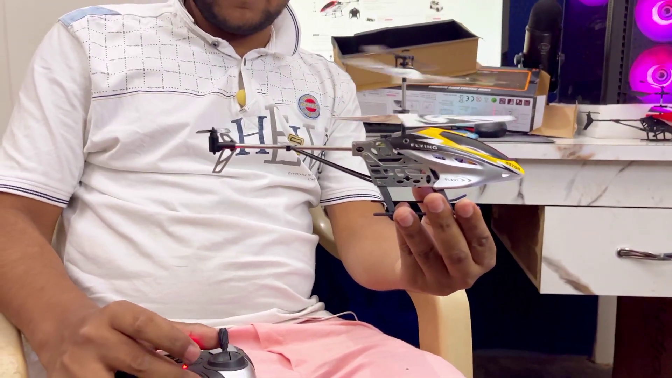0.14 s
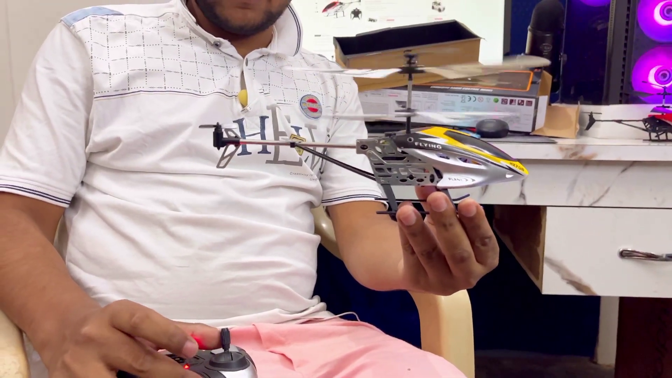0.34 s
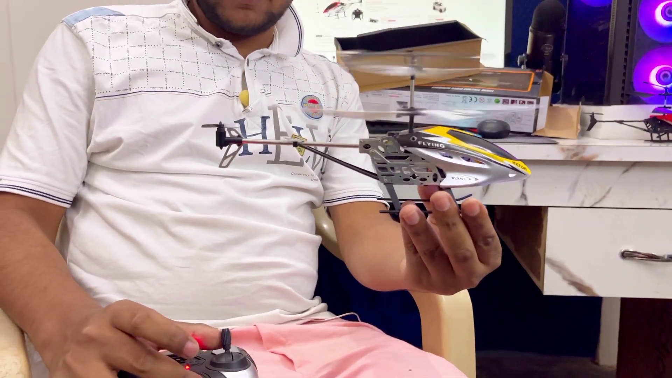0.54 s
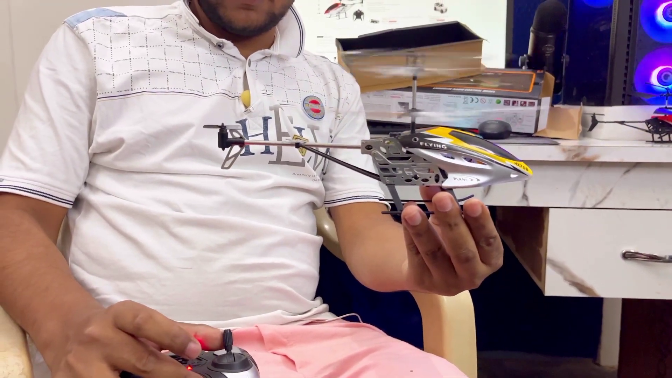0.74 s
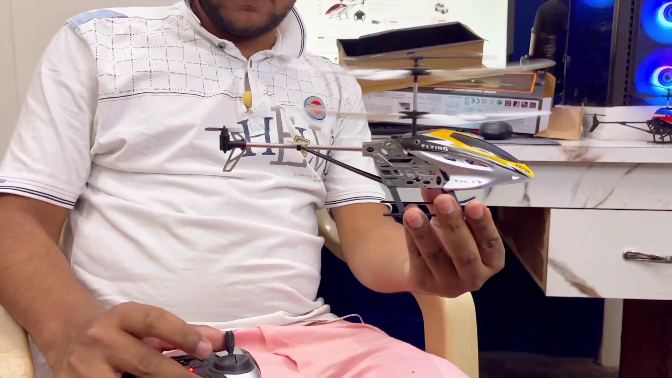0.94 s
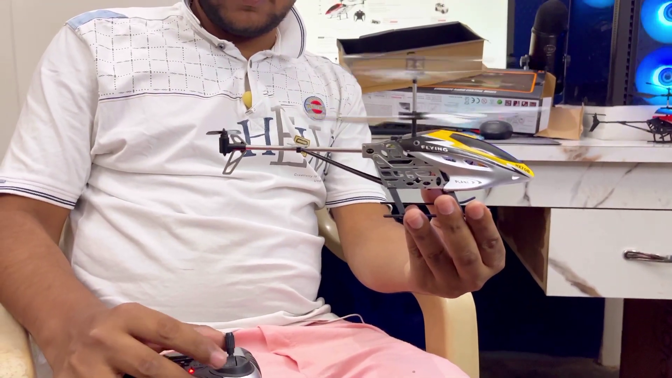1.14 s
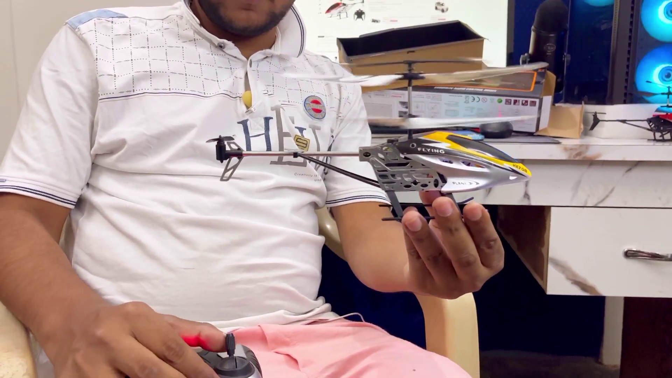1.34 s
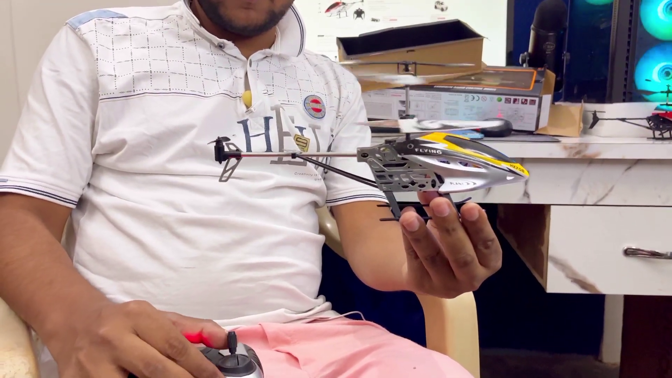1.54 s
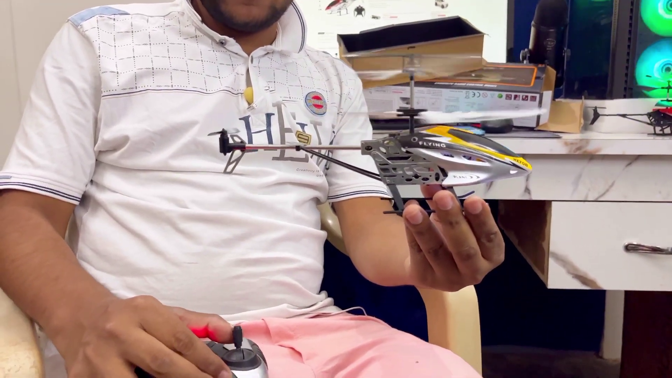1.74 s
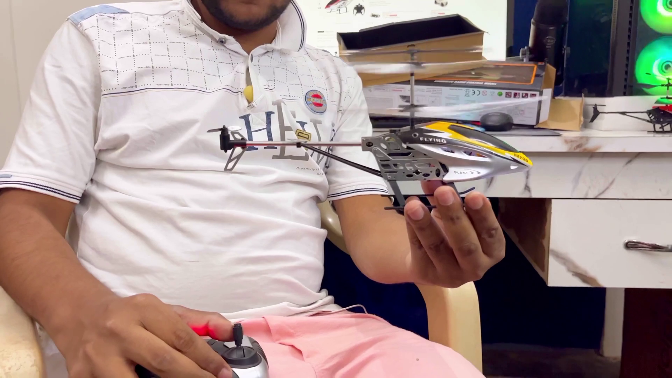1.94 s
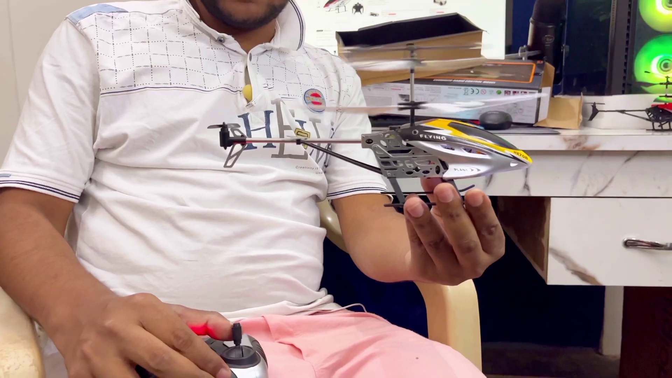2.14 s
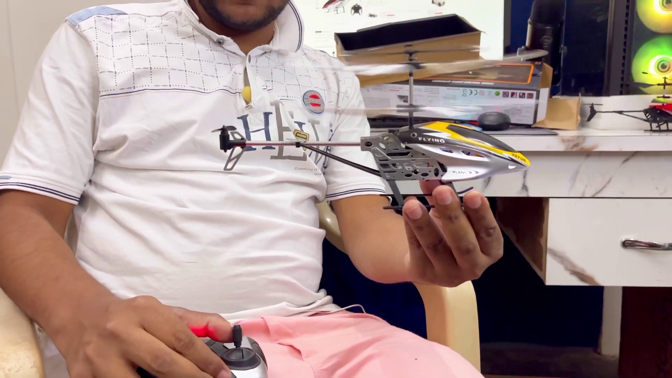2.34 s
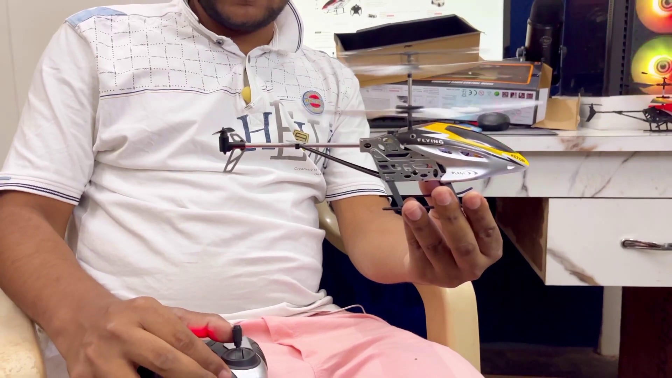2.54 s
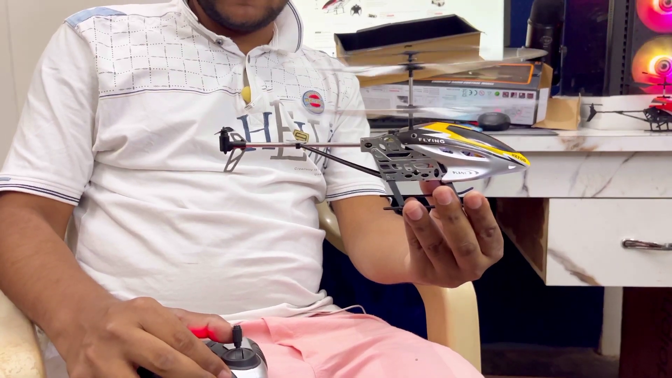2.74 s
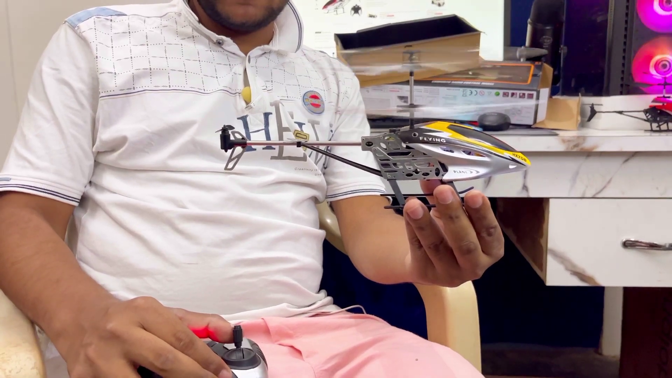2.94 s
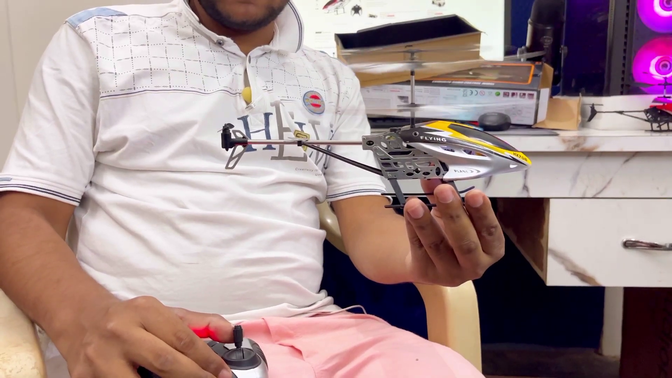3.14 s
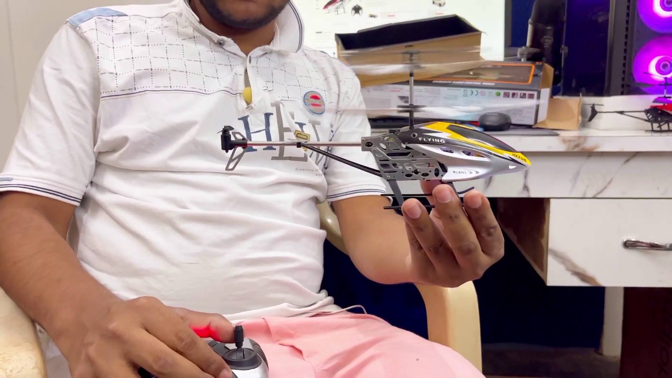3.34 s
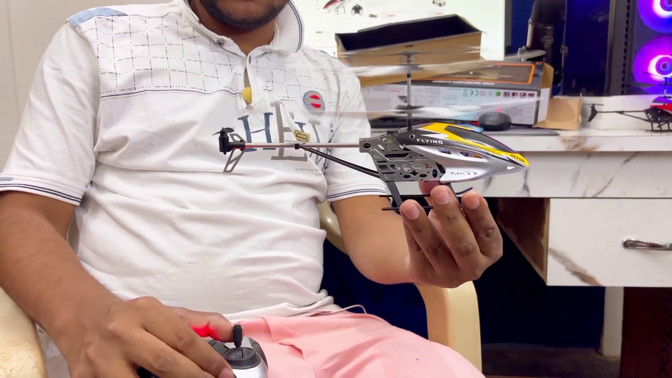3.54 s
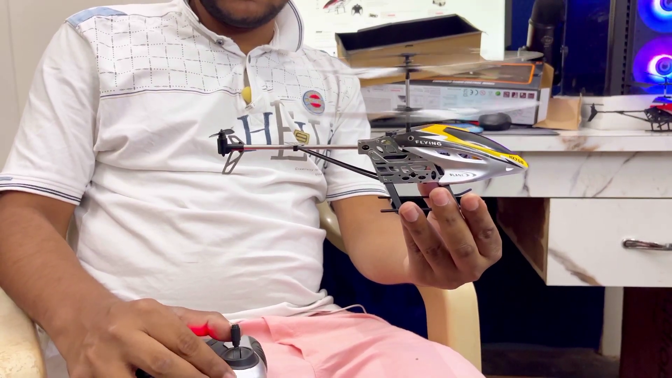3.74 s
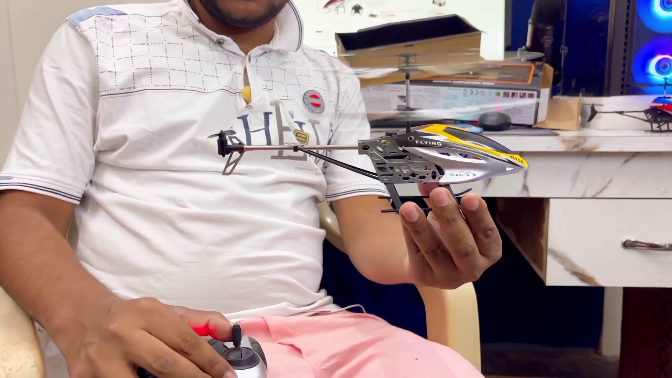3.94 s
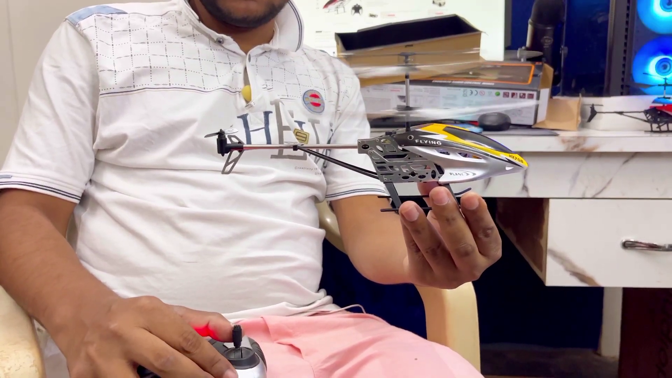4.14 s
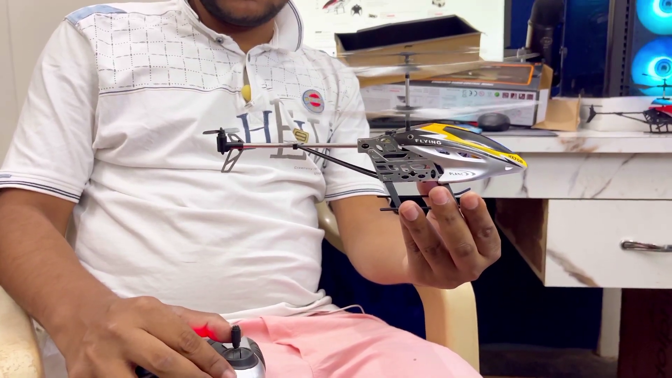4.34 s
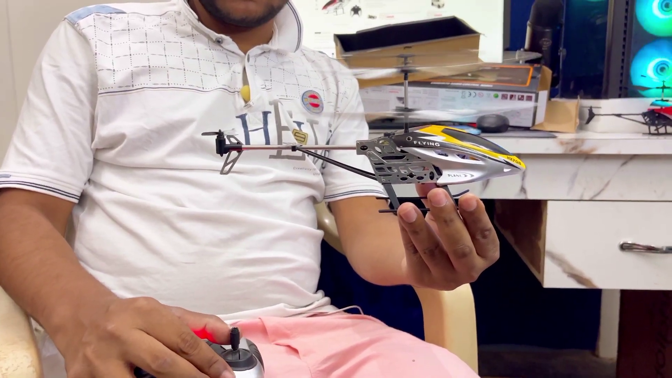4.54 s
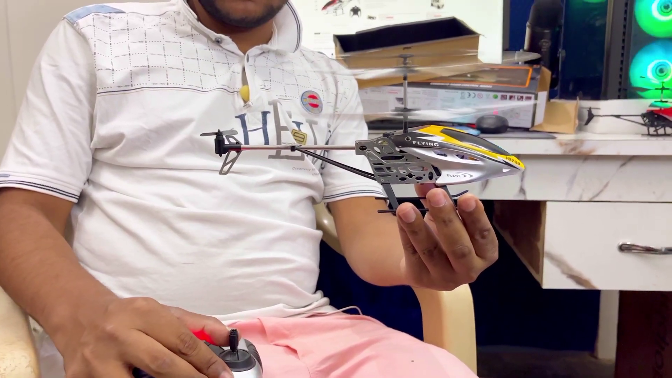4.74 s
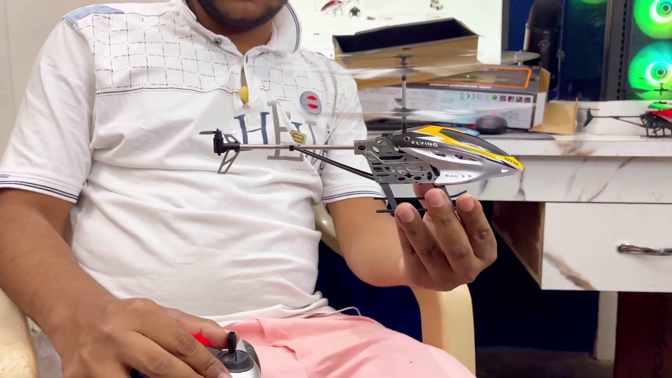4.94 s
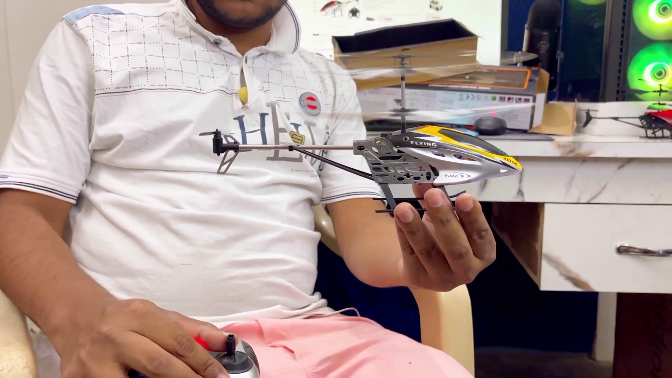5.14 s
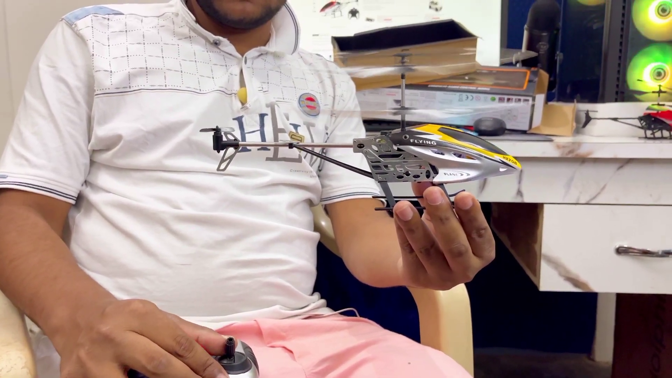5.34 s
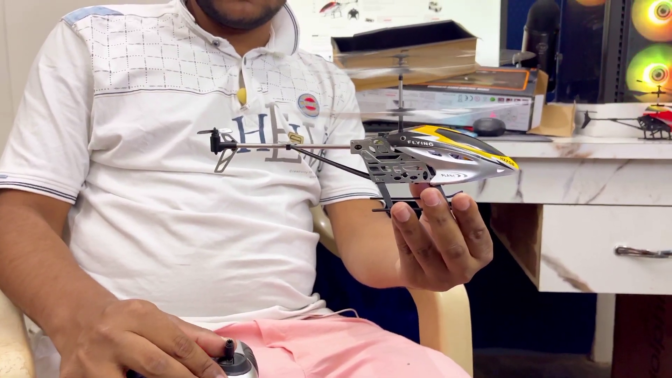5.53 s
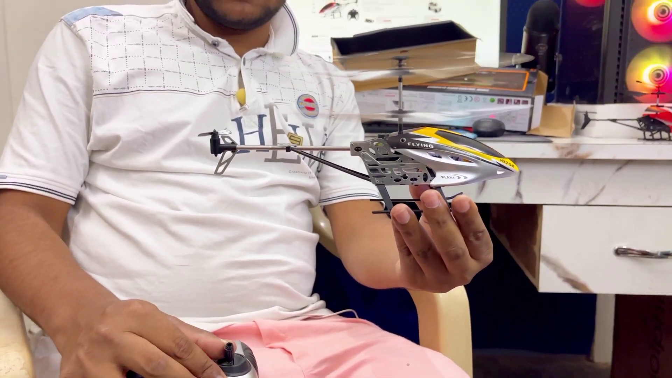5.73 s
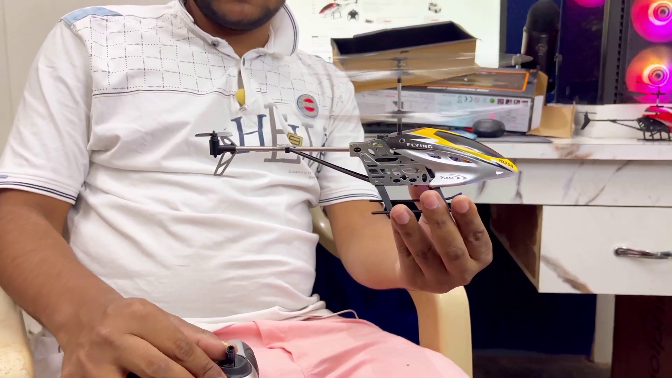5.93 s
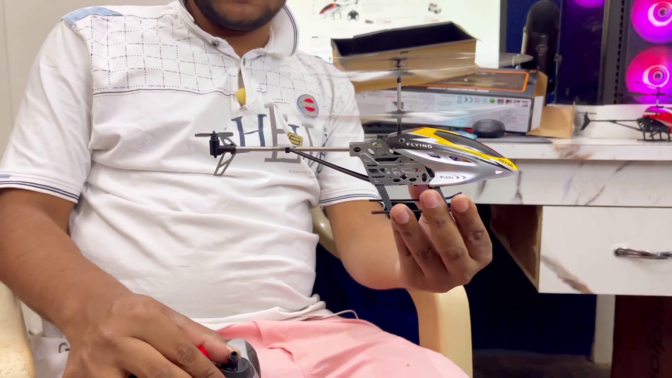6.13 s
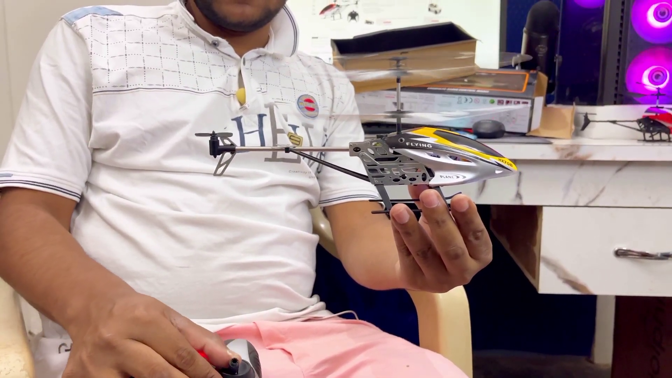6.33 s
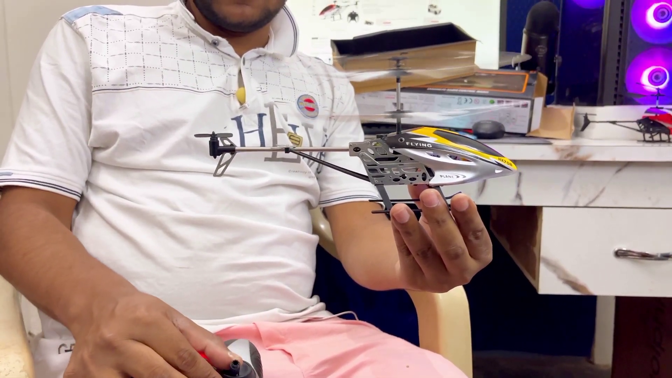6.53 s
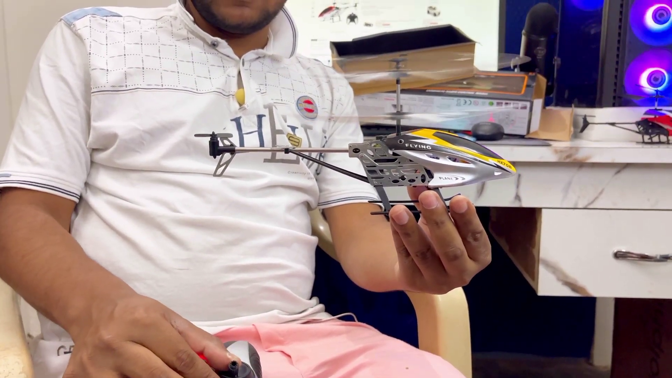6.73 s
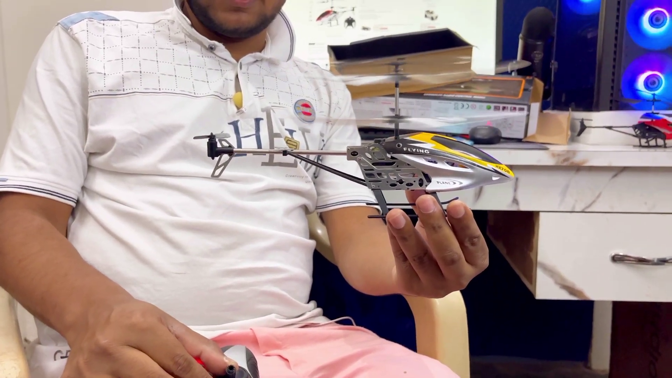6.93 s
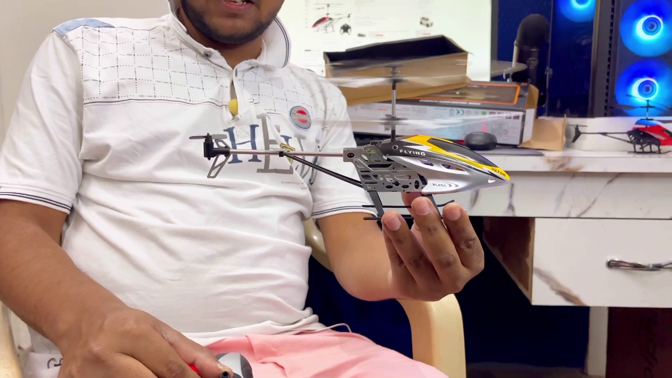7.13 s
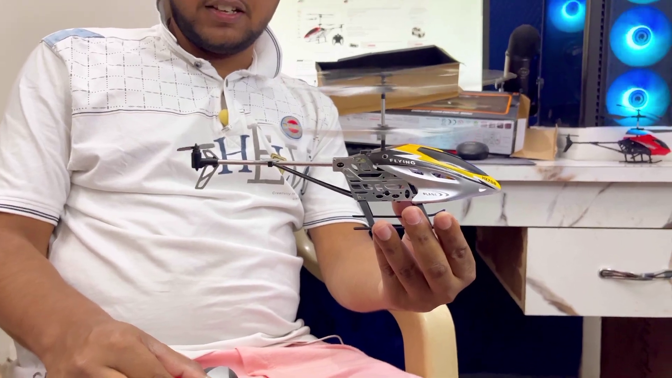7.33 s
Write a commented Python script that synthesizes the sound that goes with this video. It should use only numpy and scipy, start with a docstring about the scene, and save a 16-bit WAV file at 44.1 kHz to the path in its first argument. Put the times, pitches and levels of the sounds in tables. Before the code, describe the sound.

A small toy helicopter is heard very close in a small, quiet room with short reflections. It starts already turning slowly, its motors coasting softly. At about 0.2 s power comes on and two slightly mistuned electric motors zip upward into a rough, high gear whine with sharp brush hiss and fine rattling. At 1.2 s the power is cut: the whine softens and slides down, hiss fading. At 1.6 s it kicks in again, surging quickly by 2 s with a brief panel buzz, then climbing in small steps through 3 and 4 s. Rotor hum throbs and beats underneath, with a soft wash of air. From about 4.1 to 5.1 s a stronger canopy buzz joins. After a last rise just past 5 s, the shrill, trembling whine, bright hiss and gritty rattle hold nearly steady, sagging very slightly until the end around 7.4 s.

```python
"""Toy coaxial helicopter spinning up

Held in the hand in a small room, it is blipped once, coasts, then spins up to a steady hum.
Two small motors whine through pinions and big gears: sines locked to each shaft's angle, shaped by the frame.
Brush hiss and rotor wash are coloured noise; gear play rattles the frame, as random knocks through resonances.
Two rotors turn against each other at slightly different speeds, so their hum, sines at blade rates, throbs."""
import sys
import numpy as np
from scipy import signal
from scipy.fft import rfft, irfft, next_fast_len
from scipy.io import wavfile
from scipy.ndimage import uniform_filter1d

SR = 44100
rng = np.random.default_rng(int(sys.argv[2]) if len(sys.argv) > 2 else 0)


def inscribe(sig):
    """Save sig as 16-bit PCM at rate SR to the path in sys.argv[1].

    A 1-D sig is mono; a 2-D sig holds one channel per row.
    Samples are clipped to [-1, 1] before scaling.
    """
    pcm = np.round(np.clip(np.atleast_2d(sig).T, -1, 1) * 32767)
    wavfile.write(sys.argv[1], SR, pcm.astype(np.int16))


N = 325458

# Throttle stick moves, 0 = power off; speeds before battery sag:
# [t/s, fast motor's goal/(turns/s), slow motor's goal/(turns/s)]
THROTTLE = [(0.0, 0.0, 0.0), (0.21, 150.2, 133.6), (0.338, 334.3, 297.7), (1.17, 0.0, 0.0),
            (1.61, 174.9, 155.5), (1.783, 358.2, 317.8), (2.394, 377.6, 332.7), (2.618, 406.3, 360.0),
            (2.871, 429.3, 385.7), (3.048, 446.6, 401.2), (3.291, 451.9, 407.7), (3.63, 444.4, 401.2),
            (4.057, 491.6, 441.4), (4.466, 503.1, 446.9), (4.728, 520.2, 459.9), (5.033, 553.7, 494.1)]
# Unbalance and commutation tones, before the growth with speed and the frame:
# [multiple of shaft speed, fast motor level/dB, slow motor level/dB]
MOTOR_TONES = [(1, -50, -48.5), (2, -68, -53), (3, -51, -58), (4, -56.5, -58.5), (5, -55.5, -56),
               (6, -55.5, -55), (12, -46, -49)]
# Tooth rate, its overtones and wobbling-pinion sidebands, before mesh force and the frame:
# [multiple of shaft speed, fast motor level/dB, slow motor level/dB]
GEAR_TONES = [(7, -48.5, -74), (8, -33.5, -36), (9, -45.5, -48), (16, -34.5, -37), (24, -52, -68)]
# How hard the meshing teeth sing, before strain:
# [fast motor speed/(turns/s), fast gear level/dB, slow gear level/dB]
MESH_BY_SPEED = [(106.4, -26, -28), (172, -28, -23.5), (240, -13.5, -26), (287, -18.5, -24.5),
                 (323, -24, -28), (345, -5.5, -16), (377, -5, -14), (423, -1.5, -7), (498, 2.5, -0.5),
                 (576, -4, 4.5)]
# Frame and canopy resonances that lift the tones: [f/Hz, width/Hz, level/dB]
FRAME_MODES = [(432, 140, 1), (1398, 253, 8.5), (1968, 272, 14), (3390, 360, 1.5), (7120, 570, 0.5)]
# Blade tones swell and fade on the way up:
# [fast motor speed/(turns/s), fast rotor's hum level/dB, blade crossing level/dB]
BLADES_BY_SPEED = [(152, -61, -70), (344, -64, -57.5), (392, -48.5, -51.5), (428, -52, -47),
                   (442.6, -40.5, -44.5), (467, -39.5, -50), (472, -54, -40), (494, -50, -39),
                   (486, -42, -43), (520, -56, -54.5), (538, -42.5, -41)]
# Blades passing each other, relative: [multiple of crossing rate, level/dB]
CROSSING_TONES = [(1, -2.5), (2, -13.5), (3, -11.5), (5, -16.5)]
# Noise under power:
# [fast motor speed/(turns/s), brush hiss level/dB, gear rattle level/dB, rotor wash level/dB]
NOISE_BY_SPEED = [(100, -41.5, -36.5, -58), (144, -36.5, -39.5, -56), (209, -30.5, -37.5, -58.5),
                  (329, -31.5, -39, -53.5), (365, -28.5, -41, -48.5), (442, -24, -40, -46),
                  (510, -23.5, -35.5, -41)]
# Unloaded brushes and gears go quieter:
# [fast motor speed/(turns/s), hiss change level/dB, rattle change level/dB]
COASTING = [(91, -27, -25), (122, -15, -13.5), (156, -10, -6.5), (304, -1, -5)]
# Modes of the frame that a knock rings, relative: [f/Hz, width/Hz, level/dB]
KNOCK_MODES = [(1386, 123, -12), (1939, 86, -0.5), (2033, 88, 1.5), (3343, 170, -6), (4010, 76, -5.5),
               (7130, 650, -12)]
# The canopy buzzes at set times, each buzz pitched at a multiple of the fast motor's speed:
# [start t/s, end t/s, multiple of shaft speed, level/dB]
BUZZES = [(0.698, 1.217, 6, -42.5), (1.21, 1.36, 6, -52), (1.935, 2.25, 6, -41), (4.14, 5.103, 4, -28)]
# Noise colours, relative and per Hz: [f/Hz, level/dB]
HISS_COLOUR = [(900, -22), (1600, -12), (2800, -9.5), (3400, -4.5), (4600, -4), (5400, -2.5), (6700, 2),
               (7600, 0.5), (8400, -0.5), (9200, 1.5), (10000, -5), (10900, -2.5), (12500, -9.5),
               (13800, -13.5)]
WASH_COLOUR = [(25, -32), (40, -17), (60, 8), (130, -2.5), (250, -4), (450, 2.5), (620, 3.5), (850, 4.5),
               (1100, -2), (1700, -2), (4000, -20)]
ROOM_COLOUR = [(25, -32), (40, -6), (60, -4), (160, 2.5), (300, -4), (1000, -18), (4000, -11),
               (9000, -15.5), (14000, -68)]
# Likeness of noise at the two microphone ports, clipped to 0-1 in use: [f/Hz, likeness]
PORT_LIKENESS = [(60, 1.3), (200, 0.8), (450, 0.32), (750, 0.04), (1400, 0), (2600, 0.04), (3400, 0.3),
                 (5000, 0.01), (6500, 0.35), (7700, 0.36), (9700, 1), (11000, 0.74)]
# Phase lead of the left port: [f/Hz, phase/rad]
PORT_PHASE = [(20, 0), (2200, -.3), (3100, 1.6), (3900, 1.6), (4300, -.2), (4900, 1), (5300, 3.3),
              (5800, 3.2), (6150, 0), (6900, -.5), (7400, -2.4), (8600, -3.2), (10600, -6.1), (14000, -6.3)]
# Left port over right port: [f/Hz, level/dB]
PORT_BALANCE = [(60, -2), (110, -1.2), (200, 0.2), (370, -1), (680, 0), (1250, 0.2), (2300, -2.5),
                (4220, -0.5), (7750, 1.5), (14200, -0.79)]

GEAR_RATIO = 10.5  # motor turns per rotor turn
FULL_SPEED = 540  # reference motor speed, turns/s
START_SPEEDS = (155, 138)  # fast and slow motor still coasting, turns/s
SPIN_UP_S, COAST_S = 0.145, 0.4  # time constants of the rotors' inertia
BATTERY_SAG_PER_S = 0.003  # share of the speed lost
TAKE_UP_S = 0.015  # time constant of power and strain taking up the gear play
STRAIN_DB = 10  # rise of the tooth tones per unit of strain
SLACK_STRAIN = -0.93  # strain while the rotors drive the motors
RADIATION_HZ = 1610  # below this the frame radiates poorly
SLOW_HUM_DB, SLOW_HUM_POWER = -42, 2.6  # slow rotor at full speed; exponent of growth
UNBALANCE_DB, UNBALANCE_POWER = -53, 8.3  # fast rotor's shake at full speed; exponent of growth
BUZZ_ATTACK_SHARE, BUZZ_RELEASE_SHARE = 0.23, 0.16  # of each buzz's length
BUZZ_OVERTONE_DB = -11  # the slapping panel adds the octave
SWAY_DB_PER_S, SWAY_CENTRED_S = 0.1, 1.9  # the hand drifts slowly to the left
LOW_CUT_HZ, HIGH_CUT_HZ = 44, 14000


def motors():
    """Speeds settle exponentially to each throttle goal; also power (0-1) and strain, the relative lack of speed."""
    t = np.arange(N) / SR
    goals = np.zeros((2, N))
    speeds = np.outer(START_SPEEDS, np.ones(N))
    for start, *goal in THROTTLE:
        i = int(start * SR)
        goals[:, i:] = np.array(goal)[:, None]
        time_constant = SPIN_UP_S if goal[0] else COAST_S
        settling = np.exp(-t[:N - i] / time_constant)
        speeds[:, i:] = goals[:, i:] + (speeds[:, [i]] - goals[:, i:]) * settling
    power_on = goals[0] > 0
    pull = np.maximum(goals[0] / speeds[0] - 1, SLACK_STRAIN)
    r = np.exp(-1 / (TAKE_UP_S * SR))
    powered, strain = signal.lfilter([1 - r], [1, -r], [power_on, pull])
    return speeds * (1 - BATTERY_SAG_PER_S * t), powered, strain


def shaft_angle(speed, unsteady, lurch):
    """Angle of a shaft whose speed trembles, and lurches in the gear play while it changes fast."""
    change = uniform_filter1d(np.abs(np.gradient(speed)) * SR / speed, size=2000)
    tremble = unsteady * drift(14.8) + lurch * change * drift(60.5)
    return 2 * np.pi * (np.cumsum(speed * (1 + tremble)) / SR + rng.random())


def frame_gain(hz):
    """The small frame radiates low tones poorly, except at its resonances; powers add."""
    power = 1 / (1 + (RADIATION_HZ / hz) ** 4)
    for centre, width, db in FRAME_MODES:
        power = power + (from_db(db) / (1 + (2 * (hz - centre) / width) ** 2)) ** 2
    return np.sqrt(power)


def whine(table, speed, angle, motor, flutter_db, runout, rough):
    """Tones locked to one shaft; its off-centre big gear presses on the pinion once per rotor turn."""
    tones = 0
    for multiple, *levels_db in table:
        gain = from_db(levels_db[motor] + flutter_db * drift(10.7)) * frame_gain(multiple * speed)
        tones = tones + gain * np.sin(multiple * angle + random_phase())
    return tones * (1 + runout * np.sin(angle / GEAR_RATIO) + rough * drift(124))


def rotors(fast, slow, speed, overtone_db):
    """Two blades per rotor push the air; the hums beat, and blades cross at the sum of both blade rates."""
    turns = np.array([fast, slow]) / GEAR_RATIO
    hum_db, crossing_db = by_speed(BLADES_BY_SPEED, speed)
    pace = speed / FULL_SPEED
    fast_hum = from_db(hum_db) * np.sin(2 * turns[0])
    slow_hum = from_db(SLOW_HUM_DB) * pace ** SLOW_HUM_POWER * np.sin(2 * turns[1])
    shake = from_db(UNBALANCE_DB) * pace ** UNBALANCE_POWER * np.sin(turns[0])
    # octave of each rotor's blade rate
    overtone = from_db(overtone_db) * np.sin(2 * 2 * turns).sum(axis=0)
    crossing = 0
    for multiple, db in CROSSING_TONES:
        gain = from_db(db + 1.0 * drift(7.5))
        crossing = crossing + gain * np.sin(2 * multiple * turns.sum(axis=0) + random_phase())
    return fast_hum + slow_hum + shake + np.sqrt(2) * from_db(crossing_db) * (crossing + overtone)


def brush_hiss(fast, slow, depth, flicker_db):
    """Sliding contacts hiss in bursts, once per turn of each shaft."""
    bursts = 1 + depth * (np.sin(fast) + np.sin(slow))
    hiss = stereo_noise(from_db(at_bins(HISS_COLOUR)))
    return rms_one(hiss * bursts * from_db(flicker_db * drift(21)))


def gear_rattle(knocks_per_s, spread_db, apart):
    """Teeth knock at random within their play and ring the frame, a bank of resonances."""
    struck = rng.random(N) < knocks_per_s / SR
    knocks = struck * from_db(spread_db * rng.standard_normal(N)) * rng.choice([-1, 1], N)
    knocks = knocks * (1 + apart * rng.standard_normal((2, N)))  # unlike in the two channels
    hz = bins()
    modes = 0
    for k, (centre, width, db) in enumerate(KNOCK_MODES):
        detuning = centre / width * (hz / centre - centre / hz)
        modes = modes + (-1) ** k * from_db(db) / (1 + 1j * detuning)
    return rms_one(filtered(knocks, modes))


def canopy_buzz(angle, flutter_db, runout, rough):
    """A loose panel buzzes at set times, at a multiple of the shaft speed, shaken by the rotor."""
    t = np.arange(N) / SR
    shake = from_db(flutter_db * drift(32)) * (1 + runout * np.sin(angle / GEAR_RATIO))
    slip = rough * drift(43)  # phase, rad
    out = 0
    for start, end, multiple, db in BUZZES:
        along = (t - start) / (end - start)
        attack = np.clip(along / BUZZ_ATTACK_SHARE, 0, 1) ** 2
        release = np.clip((1 - along) / BUZZ_RELEASE_SHARE, 0, 1)
        swing = multiple * angle + slip
        slap = np.sin(swing) + from_db(BUZZ_OVERTONE_DB) * np.sin(2 * swing)
        out = out + attack * release * from_db(db) * rms_one(shake * slap)
    return out


def rotor_wash():
    """Air stirred by the blades, as coloured noise; rms 1."""
    return stereo_noise(from_db(at_bins(WASH_COLOUR)))


def room(x, t60):
    """Dense reflections of a small room: decaying noise, different at each port, from 3 ms on."""
    t = np.arange(SR // 2) / SR
    tails = rng.standard_normal((2, len(t))) * from_db(-60 * t / t60) * (t > 0.003)
    tails /= np.sqrt(np.sum(tails ** 2, axis=1, keepdims=True))
    return signal.fftconvolve(x[None], tails, axes=1)[:, :N]


def room_tone():
    """Steady background of the room, as coloured noise; rms 1."""
    return stereo_noise(from_db(at_bins(ROOM_COLOUR)))


def stereo_noise(colour):
    """Coloured noise, partly alike in the two channels; rms 1."""
    alike = np.clip(at_bins(PORT_LIKENESS), 0, 1)
    mid = filtered(rng.standard_normal(N), colour * np.sqrt(1 + alike))
    side = filtered(rng.standard_normal(N), colour * np.sqrt(1 - alike))
    return rms_one(np.array([mid + side, mid - side]))


def drift(rate):
    """Slow chance with spread 1: noise through two equal low-pass poles at rate (Hz)."""
    step = 40  # samples between the drawn points
    r = np.exp(-2 * np.pi * rate * step / SR)
    settle = 2000  # points dropped while the filter settles
    chance = rng.standard_normal(N // step + settle + 2)
    slow = signal.lfilter([1], [1, -2 * r, r * r], chance)[settle:]
    return np.interp(np.arange(N) / step, np.arange(len(slow)), rms_one(slow))


def random_phase():
    """A start phase anywhere in the cycle, rad."""
    return rng.uniform(0, 2 * np.pi)


def by_speed(rows, speed):
    """Each column of a table at the given motor speed."""
    turns, *columns = np.transpose(sorted(rows))
    return [np.interp(speed, turns, column) for column in columns]


def from_db(db):
    """Decibels to gain."""
    return 10 ** (np.asarray(db) / 20)


def rms_one(x):
    """Scale to unit power."""
    return x / np.sqrt(np.mean(x ** 2) + 1e-20)


def bins():
    """Frequencies of the spectrum of a whole track, Hz, at least 1."""
    return np.maximum(np.fft.rfftfreq(next_fast_len(N, True), 1 / SR), 1)


def at_bins(points):
    """A table over frequency, joined on a log axis."""
    hz, value = np.transpose(points)
    return np.interp(np.log(bins()), np.log(hz), value)


def filtered(x, response):
    """Apply a frequency response."""
    size = next_fast_len(N, True)
    return irfft(rfft(x, size) * response, size)[..., :N]


def scene():
    """Motors, gears and rotors, heard from close by, follow the throttle over a steady room tone."""
    speeds, powered, strain = motors()
    hiss_db, rattle_db, wash_db = by_speed(NOISE_BY_SPEED, speeds[0])
    hiss_change_db, rattle_change_db = (1 - powered) * by_speed(COASTING, speeds[0])
    mesh_db = by_speed(MESH_BY_SPEED, speeds[0]) + STRAIN_DB * strain
    angles = [shaft_angle(speed, unsteady=0.00108, lurch=0.002925) for speed in speeds]
    fast, slow = angles

    tones = canopy_buzz(fast, flutter_db=1.5, runout=0.4, rough=0.097)
    for motor, (speed, angle) in enumerate(zip(speeds, angles)):
        force = (speed / FULL_SPEED) ** 1.41  # a motor shakes the frame harder the faster it turns
        shaft = whine(MOTOR_TONES, speed, angle, motor, flutter_db=3.5, runout=0.065, rough=0.21)
        teeth = whine(GEAR_TONES, speed, angle, motor, flutter_db=2.0, runout=0.28, rough=0.29)
        tones = tones + force * shaft + from_db(mesh_db[motor]) * teeth

    blades = rotors(fast, slow, speeds[0], overtone_db=-17)
    hiss = from_db(hiss_db + hiss_change_db) * brush_hiss(fast, slow, depth=0.063, flicker_db=0.73)
    rattle = from_db(rattle_db + rattle_change_db) * gear_rattle(knocks_per_s=900, spread_db=2.5, apart=0.97)
    wash = from_db(wash_db) * rotor_wash()
    near = from_db(1.0) * tones + blades + hiss + rattle + wash
    sway_db = SWAY_DB_PER_S * (np.arange(N) / SR - SWAY_CENTRED_S)  # left over right
    near = near * from_db(np.array([sway_db, -sway_db]) / 2)
    reflections = room(from_db(-3) * tones + from_db(-7) * blades, t60=0.18)
    return near + reflections + from_db(-51) * room_tone()


def record(dry):
    """Each port has its own colour and delay; deep bass and the top are cut."""
    # half of the difference goes to each port, in opposite senses
    half = from_db(at_bins(PORT_BALANCE) / 2) * np.exp(0.5j * at_bins(PORT_PHASE))
    ports = filtered(dry, np.array([half, 1 / half]))
    low_cut = signal.butter(6, LOW_CUT_HZ, "high", fs=SR, output="sos")
    high_cut = signal.ellip(12, 0.1, 80, HIGH_CUT_HZ, fs=SR, output="sos")
    return signal.sosfilt(high_cut, signal.sosfilt(low_cut, ports))


dry = scene()
out = record(dry)
inscribe(out)
```